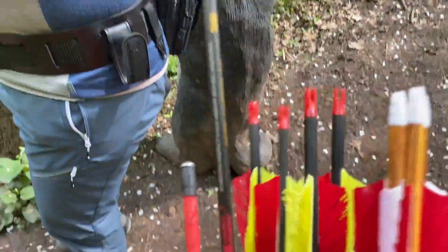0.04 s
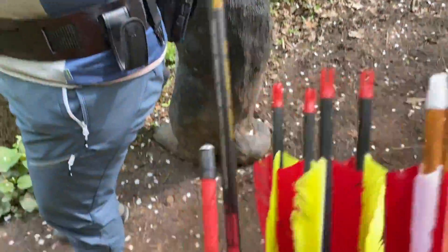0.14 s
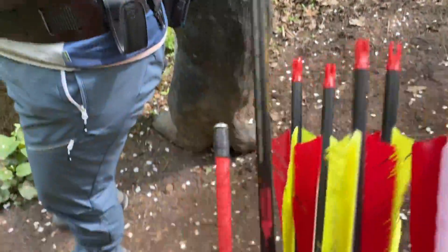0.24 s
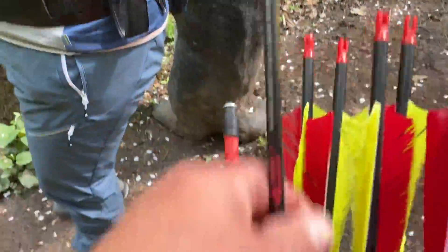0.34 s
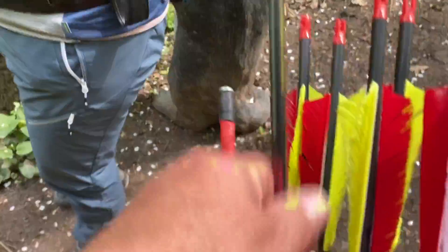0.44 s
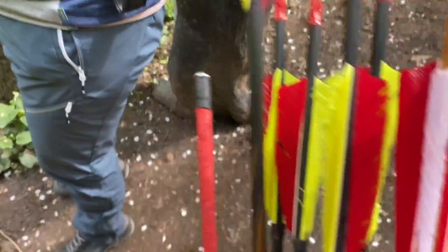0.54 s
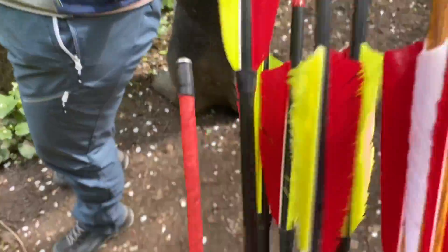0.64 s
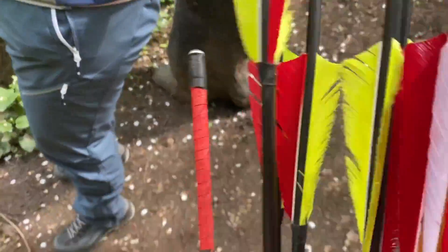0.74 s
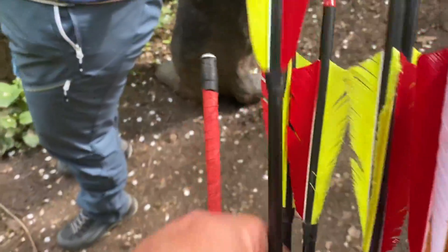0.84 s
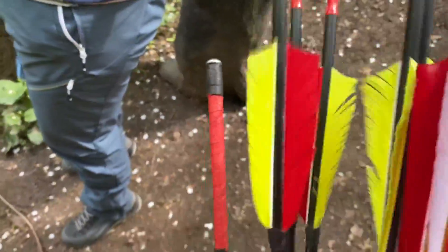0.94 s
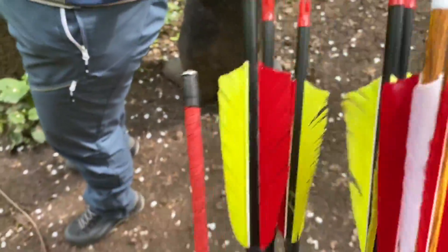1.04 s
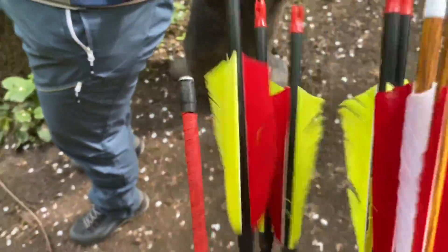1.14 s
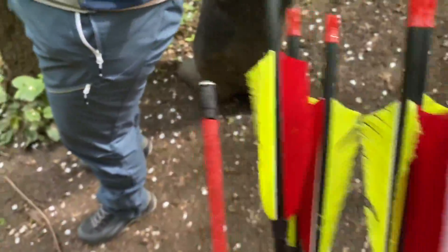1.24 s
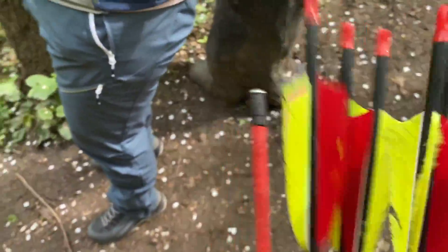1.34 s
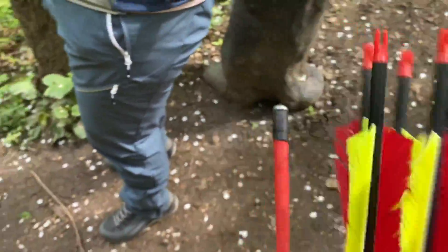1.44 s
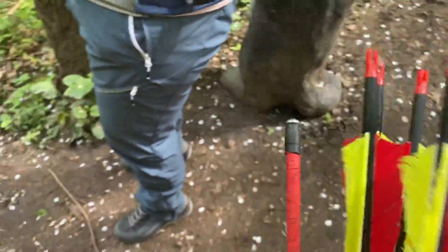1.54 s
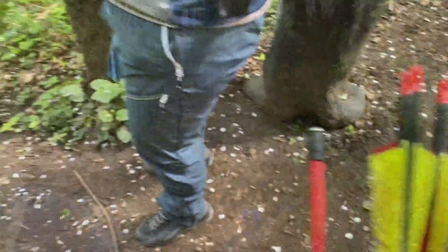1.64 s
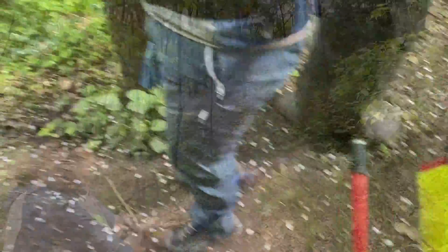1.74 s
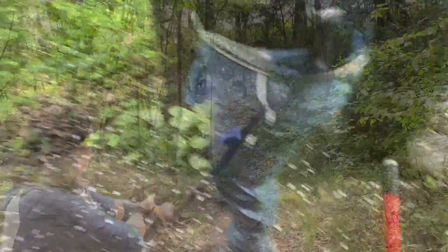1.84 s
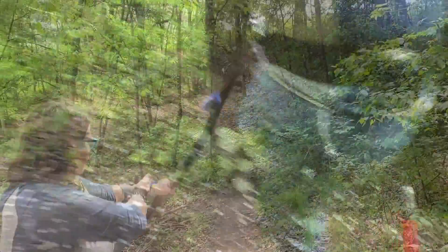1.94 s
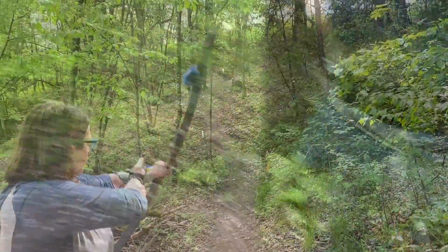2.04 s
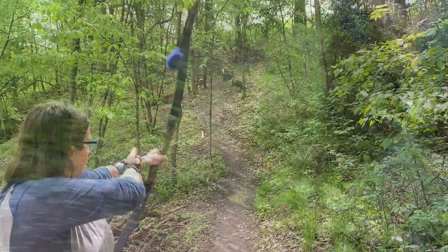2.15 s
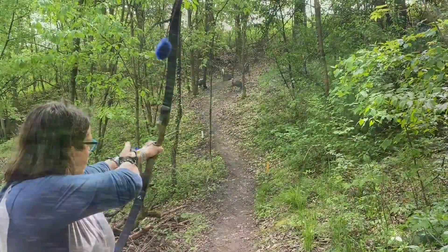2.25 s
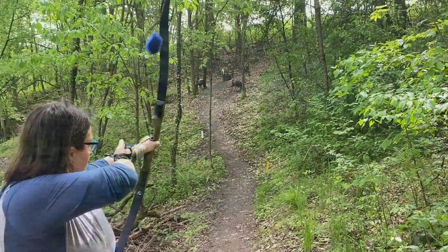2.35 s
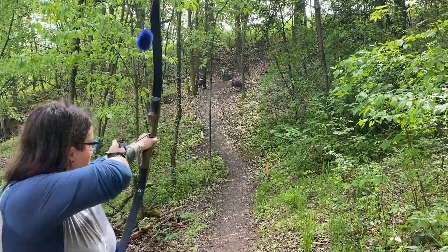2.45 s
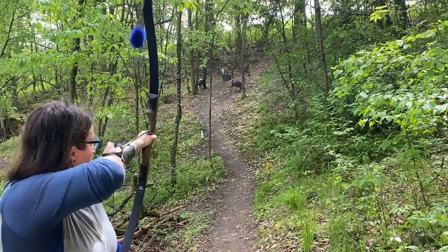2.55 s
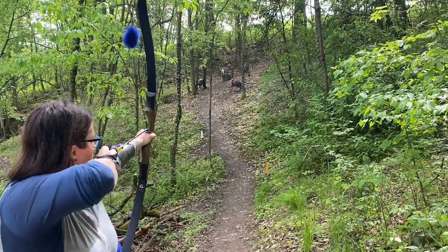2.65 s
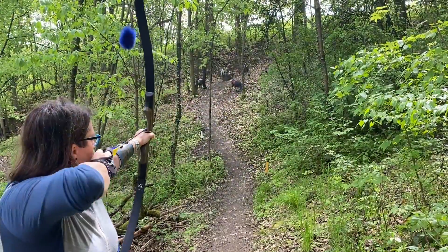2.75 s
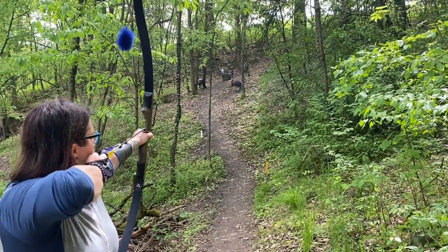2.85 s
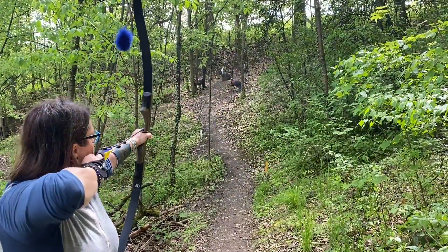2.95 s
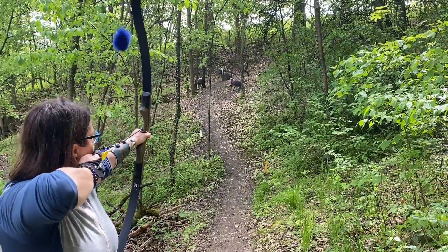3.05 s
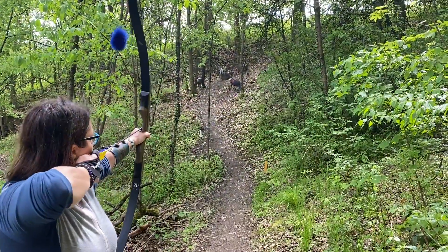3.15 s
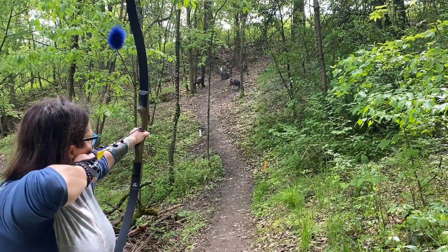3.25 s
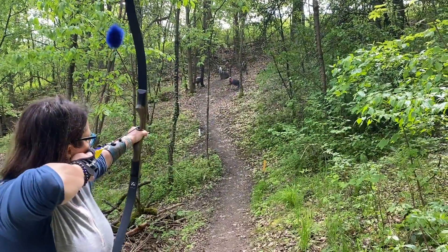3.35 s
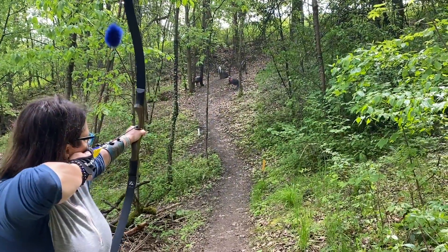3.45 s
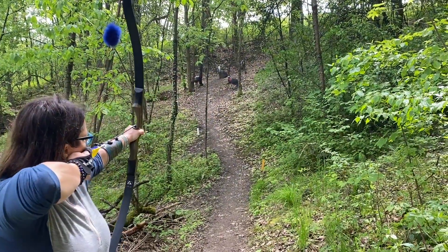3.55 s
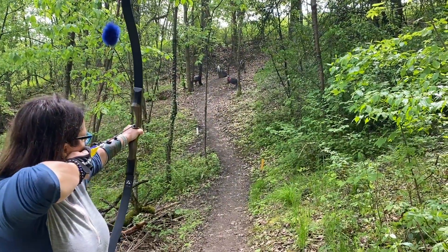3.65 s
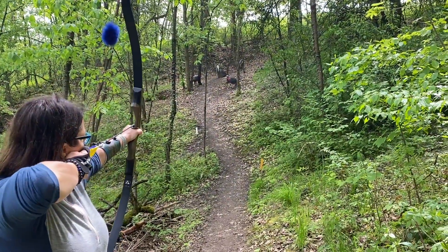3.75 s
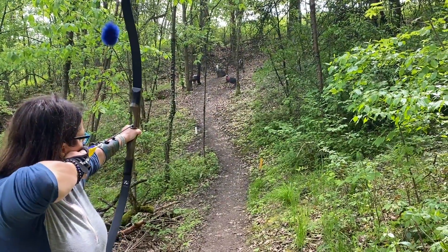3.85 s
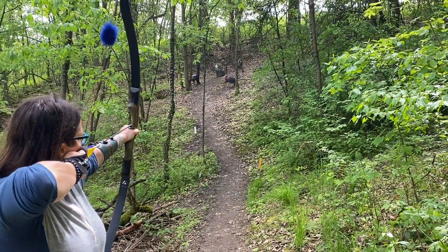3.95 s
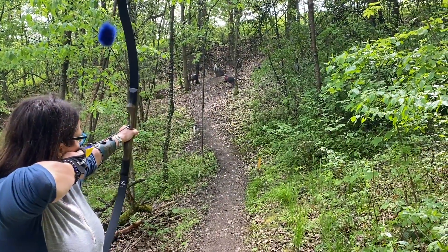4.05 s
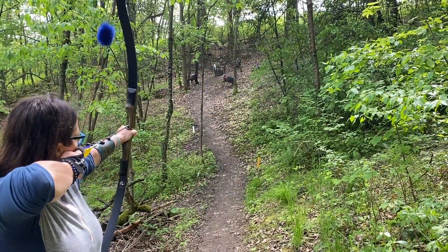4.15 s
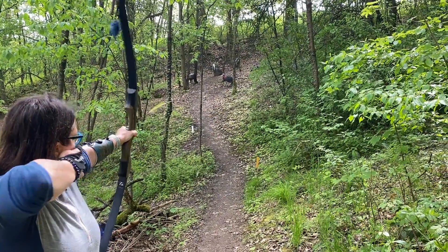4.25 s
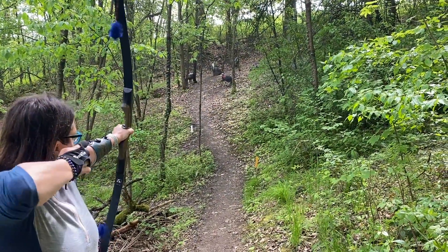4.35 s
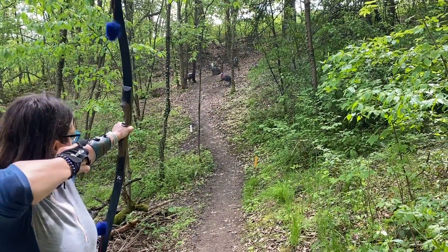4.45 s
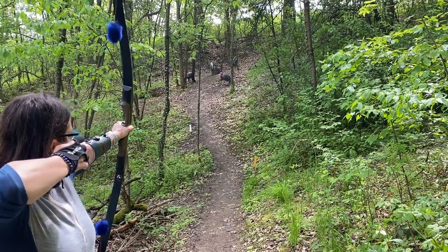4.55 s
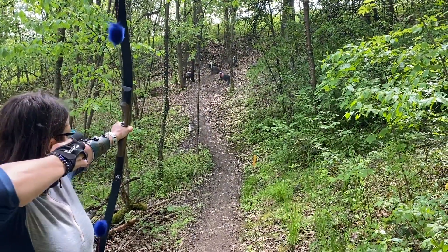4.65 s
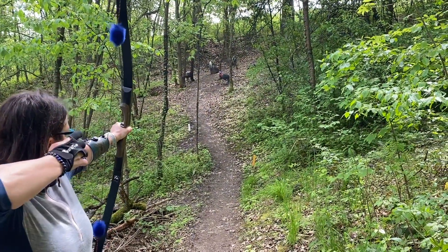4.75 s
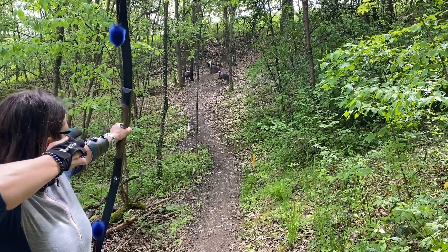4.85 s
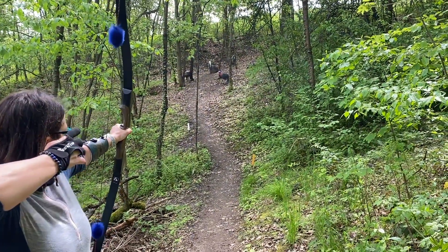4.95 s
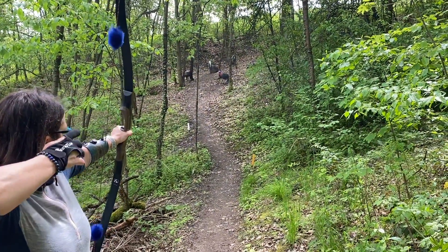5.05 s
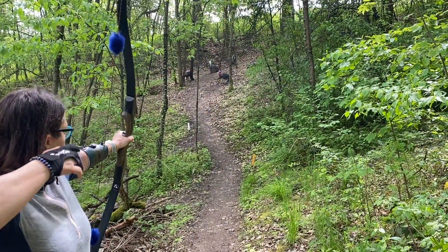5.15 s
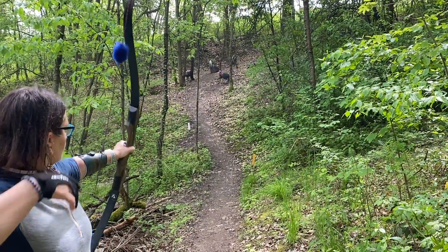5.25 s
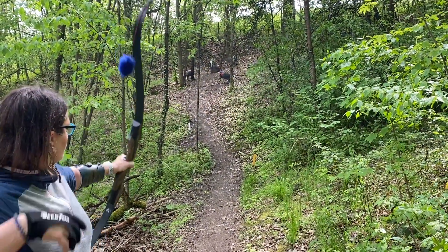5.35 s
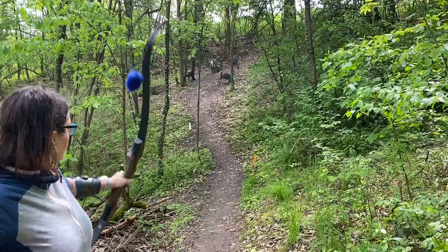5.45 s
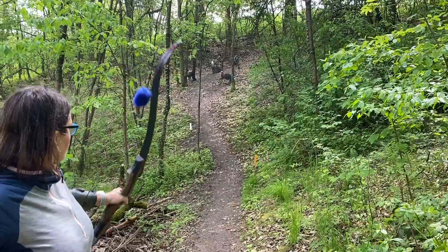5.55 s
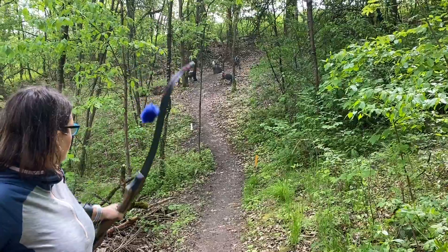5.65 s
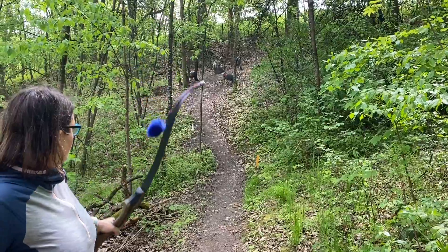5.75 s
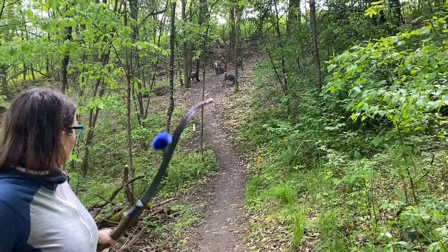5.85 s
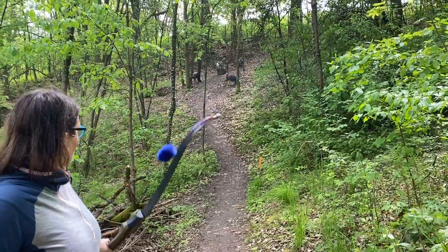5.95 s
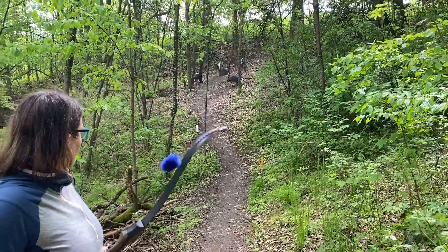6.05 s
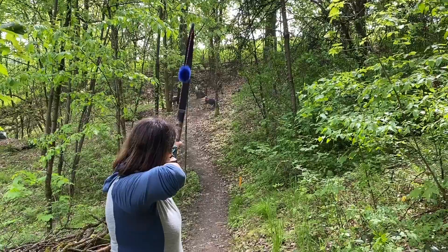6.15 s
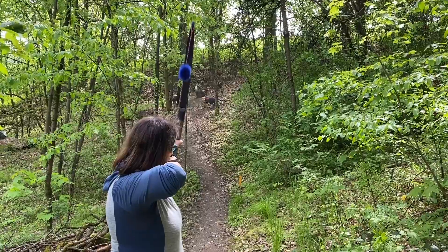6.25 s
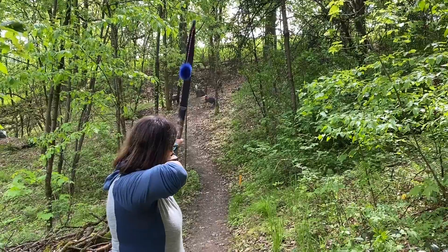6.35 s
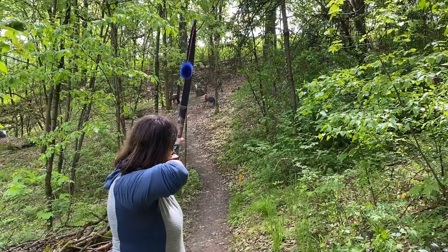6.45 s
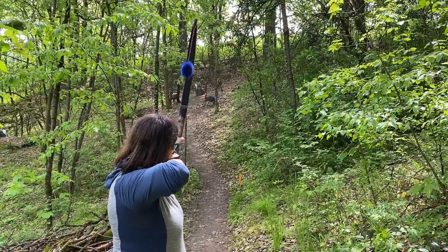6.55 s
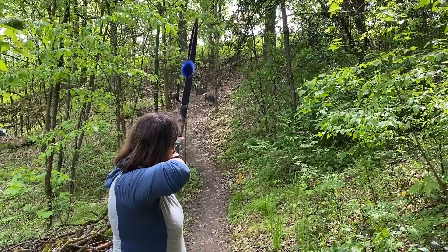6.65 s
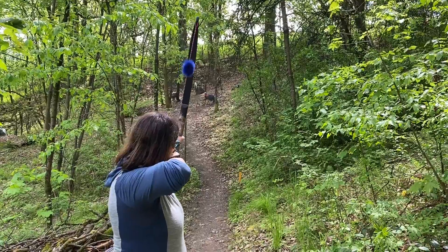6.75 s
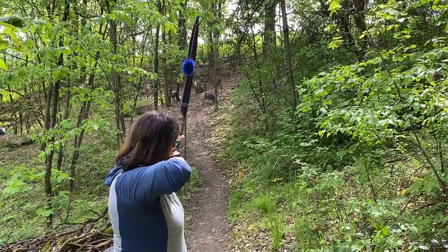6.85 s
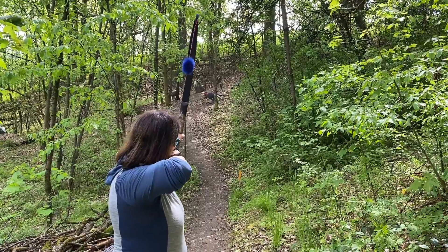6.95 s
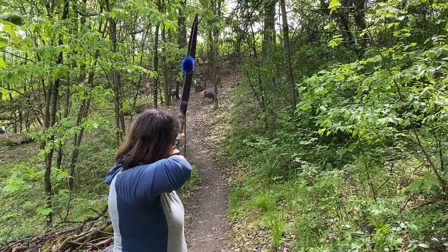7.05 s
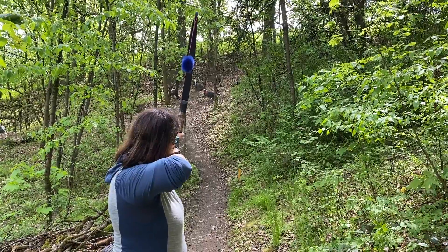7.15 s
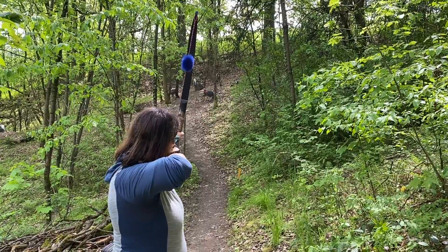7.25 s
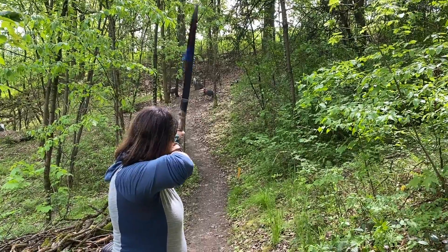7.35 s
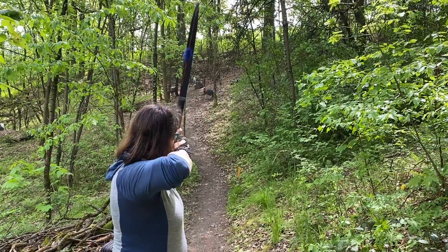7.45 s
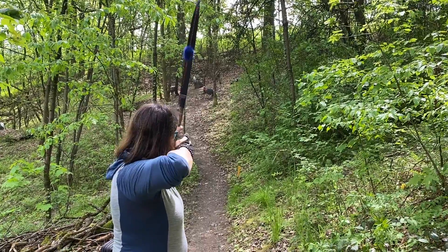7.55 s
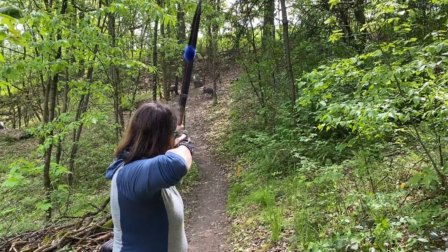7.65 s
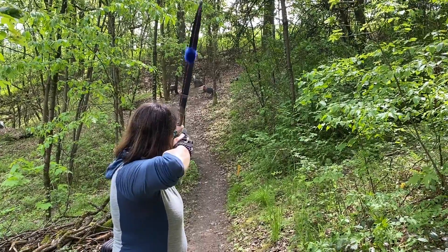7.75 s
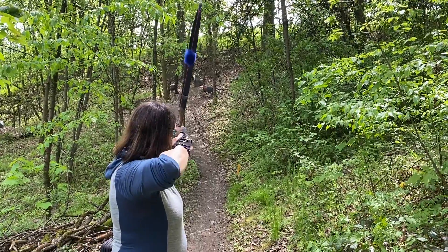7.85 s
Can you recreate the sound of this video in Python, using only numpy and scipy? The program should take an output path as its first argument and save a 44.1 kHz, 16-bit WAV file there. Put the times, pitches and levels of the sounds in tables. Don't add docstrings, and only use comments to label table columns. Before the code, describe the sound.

Outdoors among trees, dry feather strokes and clicking arrow shafts come right at the microphone, with low booms from the quiver, growing dense and loud. Then calm air, a low hum and small distant chirps. A sharp bowstring slap and woody vibration are followed by a leaf tick and a blunt foam thud with a diffuse forest echo. Faint feet and cloth move, birds continue, and another bow shot cracks near the end, with no second impact.

```python
import sys
import numpy as np
from scipy import signal
from scipy.io import wavfile

SR = 44100
rng = np.random.default_rng(int(sys.argv[2]) if len(sys.argv) > 2 else 0)


def volts(x):
    e = np.asarray(x, float) / 20
    return 10 ** e


def master(y):
    cut = np.clip(np.atleast_2d(y).T, -1, 1)
    pcm = np.round(cut * 32767)
    wavfile.write(sys.argv[1], SR, pcm.astype(np.int16))


N = 347949


def at_hz(points, hz):
    curve_hz, value = np.transpose(points)
    return np.interp(np.log(hz), np.log(curve_hz), value)


def drift(rate):
    step = 40
    r = np.exp(-2 * np.pi * rate * step / SR)
    white = rng.standard_normal(N // step + 2002)
    slow = signal.lfilter([1], [1, -2 * r, r * r], white)[2000:]
    return np.interp(np.arange(N) / step, np.arange(len(slow)), slow / slow.std())


def ring(clicks, hz, t60):
    r, w = volts(-60 / (t60 * SR)), 2 * np.pi * hz / SR
    return signal.lfilter([0, np.sin(w)], [1, -2 * r * np.cos(w), r * r], clicks + 1e-18)


def click(s, size):
    out = np.zeros(N)
    np.add.at(out, (np.asarray(s) * SR).astype(int), size)
    return out


def pan(db):
    return volts(np.array([[db / 2], [-db / 2]]))


def ports(x, lag):
    sample = np.arange(len(x[1]))
    return np.array([x[0], np.interp(sample - lag, sample, x[1])])


BAND_EDGES = 25.1 * 2 ** np.arange(0, 9.6, .5)
BANK = [signal.butter(2, pair, "band", fs=SR, output="sos") for pair in zip(BAND_EDGES, BAND_EDGES[1:])]


def bands(spectrum, envelope, alike, white):
    centres = np.sqrt(BAND_EDGES[:-1] * BAND_EDGES[1:])
    gains = volts(at_hz(spectrum, centres)) * (centres > spectrum[0][0])
    gains = gains / np.sqrt(np.sum(gains ** 2 * np.diff(BAND_EDGES)) * 2 / SR)
    out = 0
    for k in np.flatnonzero(gains):
        likeness = np.clip(alike(centres[k]), -1, 1)
        mid, side = white[k % 2]
        pair = np.sqrt((1 + likeness) / 2) * mid + np.sqrt((1 - likeness) / 2) * side * [[1], [-1]]
        out = out + gains[k] * signal.sosfilt(BANK[k], pair * envelope(centres[k]))
    return out


def bursts(hits, spectrum, treble_alike, spread_db, rise_ms, lag):
    def alike(hz):
        return treble_alike + (1 - treble_alike) / (1 + (hz / 700) ** 2)

    out = np.zeros((2, N))
    for s, peak_db, t60, pan_db, dark_db in hits:
        t = np.arange(int(1.3 * SR * min(t60, .3)) + 900) / SR
        rise = 1 - np.exp(-1000 * t / rise_ms)

        def shape(hz):
            fall_db = -60 * t / t60 * (hz / 2000) ** 0.3
            colour_db = spread_db * rng.normal() - dark_db * np.log2(hz / 2000)
            return rise * volts(fall_db + colour_db)

        puff = ports(bands(spectrum, shape, alike, rng.standard_normal((2, 2, len(t)))), lag)
        at = int(s * SR)
        out[:, at:at + len(t)] += volts(peak_db) * pan(pan_db) * puff
    return out


def knocks(rows, glide, swell_s):
    out = np.zeros(N)
    for s, db, hz, t60 in rows:
        t = np.arange(int(t60 * SR)) / SR
        swell = 1 - np.exp(-t / swell_s)
        cycles = hz * (t + glide * swell_s * swell)
        at = int(s * SR)
        out[at:at + len(t)] += volts(db - 2.0 - 60 * t / t60) * swell * np.sin(2 * np.pi * cycles)
    return out


# time in seconds, level in dB.
GUSTS = [(0, -49.5), (.42, -51.5), (.9, -43.5), (1.49, -43), (1.8, -48.5), (2.3, -56.5), (2.7, -52),
         (3.1, -55.5), (4.15, -54.5), (5.1, -52.5), (5.6, -54), (6.0, -51), (6.5, -56.5), (7.89, -52)]
# frequency in Hz, density in dB per Hz.
WIND = [(12, -45), (20, -15), (35, -6.5), (59, 1), (139, -3), (178, -5.5), (274, -13), (300, -16),
        (390, -36.5), (660, -120)]
# frequency in Hz, density in dB per Hz.
LEAVES = [(88, -25), (150, 1), (1310, -21), (2130, -23), (7510, -38.5), (8130, -37), (8620, -61.5),
          (9890, -43), (10900, -39.5), (12300, -43), (13000, -61.5), (16500, -62)]
# frequency in Hz, left-right likeness from -1 to 1.
AIR_ALIKE = [(60, 0.94), (180, 0.31), (550, -0.63), (1650, 0.12), (4970, 0.83), (15000, 0.52)]


def air_alike(hz):
    return at_hz(AIR_ALIKE, hz)


def air():
    gust_s, gust_level = np.transpose(GUSTS)
    gust_db = np.interp(np.arange(N) / SR, gust_s, gust_level)
    wind_db = gust_db + 3
    leaves_db = -54.5 + 0.94 * (gust_db - gust_db.mean())
    flutter = drift(9.6)

    def wind_shape(hz):
        return (hz < 260) * volts(wind_db + 2.4 * flutter + 2.2 * drift(2.2))

    def leaves_shape(hz):
        return volts(leaves_db + 1.5 * drift(4.0))

    white = rng.standard_normal((2, 2, N))
    wind = bands(WIND[:-1], wind_shape, air_alike, white)
    leaves = bands(LEAVES, leaves_shape, air_alike, white[::-1])
    return (wind + leaves) * pan(2.5)


# start in seconds, hold in seconds, level in dB.
STROKES = [(0, 0.1, -43), (0.16, 0.084, -48.5), (0.285, 0.16, -57), (0.432, 0.13, -44),
           (0.539, 0.052, -39.5), (0.636, 0.074, -42.5), (0.746, 0.043, -47), (0.856, 0.03, -43.5),
           (0.886, 0.057, -36), (0.981, 0.06, -46), (1.095, 0.29, -40), (1.416, .075, -37.5),
           (1.493, 0.03, -39), (1.563, 0.11, -42.5), (1.746, 0.614, -70.5), (2.189, 0.062, -63),
           (4.221, 0.0065, -58), (7.352, .006, -63), (5.831, 0.056, -63.5), (5.926, 0.086, -71.5)]
# frequency in Hz, density in dB per Hz.
FEATHER = [(180, -27.5), (300, -12), (2610, -0.5), (5190, 2), (7890, -2), (8870, -30), (9810, -3.5),
           (11600, -1.5), (13300, -13.5), (15700, -2.5), (16500, -29)]
# mode in Hz, level in dB, t60 in seconds.
TUBE = [(660, -24.5, 0.029), (1030, -27, 0.02), (1450, -27, 0.0095), (1944, -30, 0.013),
        (2350, -29, 0.0094), (3400, -30, 0.0035)]


def rustle():
    t = np.arange(N) / SR
    rise_db_per_s, fall_db_per_s = 900, 240
    strokes_db = []
    for s, hold, db in STROKES:
        before, after = np.maximum(s - t, 0), np.maximum(t - s - hold, 0)
        strokes_db.append(db - rise_db_per_s * before - fall_db_per_s * after)
    level_db = np.max(strokes_db, axis=0)
    dark_db = 0.1118 * (-50.5 - np.maximum(level_db, -66))
    grain_db = 1.0 * drift(25.0) + 1.6 * drift(120.0) + 2.5 * drift(450.0)
    grain = volts(level_db + 4 + np.clip(grain_db, -11, 8))

    def shape(hz):
        patches_db = 2.6 * drift(22.0) + 2.5 * drift(170.0)
        return grain * volts(patches_db - dark_db * np.log2(hz / 5000)) + 1e-12

    def alike(hz):
        return 0.074 + 0.12 / (1 + (hz / 300) ** 2)

    noise = bands(FEATHER, shape, alike, rng.standard_normal((2, 2, N)))
    tube = 0
    for hz, db, t60 in TUBE:
        contact = volts(np.minimum(2.7 * drift(9.5), 6))
        tube = tube + volts(db) * ring(noise * contact, hz, t60)
    return (noise + tube) * pan(0.73)


# start in seconds, peak in dB, left over right in dB, darkness in dB.
CLACKS = [(0.099, -27.5, -3, 4.5), (0.2746, -38.5, 4, 1), (0.428, -57, 0, -10.5), (0.578, -28, -14, 9),
          (0.636, -32, 10, 10), (0.6868, -28, -1, 7.5), (0.7222, -26, 4, 8), (0.8457, -39, -7, 18.5),
          (0.8912, -22, 4, -1), (0.923, -40, 1, -7.5), (0.9548, -26, 3, -1.5), (1.1186, -44, 4, -3),
          (1.1608, -14.5, 3, 0.5), (1.1845, -15, -4.5, 1), (1.234, -24, 0, -0.5), (1.2575, -23.5, -2, 6.5),
          (1.2842, -27.5, 1, 5.5), (1.3718, -16, -2, 3.5), (1.3991, -14.5, 0.5, -0.5),
          (1.5005, -11, 1.5, 3), (1.511, -20, 2, 0), (1.5529, -25, -3, -2), (1.5775, -12.5, 0, -2.5),
          (1.608, -8, -0.5, -1), (1.6312, -11.5, 0, 0), (1.6765, -24, 1, 6), (1.705, -27.5, -1, 6)]
# start in seconds, peak in dB, t60 in seconds.
EDGES = [(0.427, -43, 0.019), (0.7225, -32, 0.014), (0.8917, -20, 0.014), (1.2338, -25, 0.023),
         (1.3997, -12, 0.02), (1.427, -24.5, .02), (1.5523, -23, .025), (1.5774, -15, .022),
         (1.6082, -16, .03), (1.6317, -19, .022), (1.7837, -41.5, 0.021)]
# frequency in Hz, density in dB per Hz.
SHAFT = [(240, -28.5), (400, -15.5), (1370, -4), (1900, -3), (3530, -1.5), (3880, 0), (6800, 2),
         (9130, -6.5), (11200, -4), (15700, -16), (16500, -34)]
# mode in Hz, level in dB, t60 in seconds.
SHAFT_MODES = [(610, -15, 0.056), (999, -10.5, 0.051), (1840, -7.5, 0.12), (2260, -11, 0.033),
               (4000, -11, 0.018), (4720, -7.5, 0.049), (5640, -11.5, .03), (6500, -10, 0.027)]
# start in seconds, peak in dB, pitch in Hz, t60 in seconds.
SHAFT_RINGS = [(0.072, -41, 1510, 0.068), (0.1, -32.5, 1070, 0.06), (0.173, -39, 1390, 0.084),
               (0.579, -34, 625, 0.046), (0.635, -46, 634, 0.06), (0.721, -33.5, 1030, 0.15),
               (0.847, -42, 622, 0.046), (0.893, -24, 644, 0.06), (0.954, -46, 575, 0.06),
               (1.118, -32, 760, 0.073), (1.161, -18.5, 1098, 0.07), (1.183, -34, 1120, 0.06),
               (1.233, -31, 1180, 0.052), (1.257, -34, 680, 0.052), (1.364, -17, 685, 0.06),
               (1.401, -25, 954, 0.06), (1.456, -30, 1500, 0.04), (1.5015, -3, 453, 0.025),
               (1.5008, -2, 1021, 0.03), (1.579, -40, 1182, 0.06), (1.607, -27, 1030, 0.073),
               (1.631, -22, 860, 0.06), (1.677, -35, 630, 0.06),
               (0.1734, -35.5, 1840, 0.091), (0.274, -40, 1650, 0.055), (0.5787, -25, 1560, 0.035),
             (0.6873, -29, 2400, 0.057), (0.7228, -41, 1500, 0.05), (0.8917, -20.5, 1740, 0.03),
             (0.956, -27, 1630, 0.067), (1.1618, -39, 1850, 0.042), (1.1846, -20, 1710, 0.05),
             (1.2335, -30, 2020, 0.063), (1.3737, -28, 2200, 0.062), (1.4002, -11, 2235, 0.055),
             (1.4595, -24, 3400, 0.04), (1.5012, -1, 1970, 0.022), (1.5534, -26, 1960, 0.05),
             (1.5778, -14.5, 2060, 0.047), (1.6075, -9.5, 1870, 0.05), (1.6314, -16, 2080, 0.05)]
# start in seconds, peak in dB, pitch in Hz, t60 in seconds.
HIGH_RINGS = [(0.412, -40, 7100, 0.06), (0.4265, -36, 7010, 0.04), (0.8919, -13, 5230, 0.04),
              (0.923, -19, 7200, 0.059), (0.9544, -20, 5350, 0.028), (1.0864, -30, 3790, 0.04),
              (1.1199, -31, 7410, 0.04), (1.1638, -6.5, 5400, 0.028), (1.1846, -8, 6400, 0.047),
              (1.233, -18, 6160, 0.036), (1.2575, -18, 6500, 0.025), (1.3597, -21, 4090, 0.041),
              (1.3718, -16.5, 7256, 0.068), (1.3982, -16, 4450, 0.013), (1.425, -26, 4650, 0.04),
              (1.4914, -13, 4500, 0.027), (1.5529, -15, 6510, 0.025), (1.5775, -8, 4735, 0.035),
              (1.6084, -7, 3830, 0.04), (1.6313, -7, 4680, 0.04), (1.6772, -24, 4690, 0.04)]
# start in seconds, peak in dB, pitch in Hz, t60 in seconds.
BOOMS = [(0.473, -32, 250, 0.041), (0.536, -28.5, 124, 0.17), (0.581, -11, 286, 0.052),
         (0.848, -15, 269, 0.031), (0.909, -13, 270, 0.065), (0.927, -21.5, 300, 0.11),
         (0.949, -7, 250, 0.054), (1.365, -9.5, 277, 0.05), (1.402, -26.5, 270, 0.059),
         (1.5046, -9, 250, 0.07), (1.641, -11, 249, 0.059), (1.686, -26, 260, 0.052)]


def quiver():
    hits = [(s, db, .056 * np.exp(-0.051 * dark_db), pan_db, dark_db) for s, db, pan_db, dark_db in CLACKS]
    clacks = bursts(hits, SHAFT, treble_alike=0.33, spread_db=3.0, rise_ms=0.79, lag=1.3)
    edges = [(s, db, t60, 1.0, -2.5) for s, db, t60 in EDGES]
    clacks += bursts(edges, SHAFT, treble_alike=0.84, spread_db=1.5, rise_ms=0.16, lag=2.6)

    s, peak_db, _, dark_db = np.array(CLACKS).T
    rings = np.zeros((2, N))
    for hz, db, t60 in SHAFT_MODES:
        dulled_db = peak_db + db - 16.5 - .5 * np.abs(dark_db * np.log2(hz / 2000))
        for ear in (0, 1):
            luck_db = rng.normal(0, 4.5, len(s))
            rings[ear] += ring(click(s, volts(dulled_db + luck_db)), hz, t60)

    notes = SHAFT_RINGS + [(s, db, hz, t60 * .65) for s, db, hz, t60 in HIGH_RINGS]
    notes = notes + [(s, db - 7.5, hz * 1.045, t60) for s, db, hz, t60 in notes]
    ringing = volts(-5) * knocks(notes, glide=0, swell_s=0.00059)
    rings += ports([ringing, ringing], lag=0.5) * pan(1.5)

    overtones = [(s, db - 14.5, hz * 2.3, t60) for s, db, hz, t60 in BOOMS]
    booms = knocks(BOOMS, glide=0.27, swell_s=0.0019) + knocks(overtones, glide=0.47, swell_s=0.0028)
    return clacks + rings + booms * pan(1.1)


# start in seconds, peak in dB.
BUMPS = [(0.248, -28.5), (0.387, -31), (0.732, -24), (2.128, -22.5), (2.848, -34), (3.403, -27.5),
         (5.918, -32), (6.485, -28.5), (7.07, -32.5), (7.231, -36)]


def port_bumps():
    hz, t60 = 60.7, 0.12
    return knocks([(s, db, hz, t60) for s, db in BUMPS], glide=0.065, swell_s=0.0034) * pan(2.5)


# start in seconds, first Hz, last Hz, level in dB.
CHIPS = [(2.465, 2953, 2490, -63), (2.81, 4535, 3315, -60), (3.218, 4440, 3860, -66),
         (7.205, 4780, 4040, -71), (3.478, 3150, 4790, -61), (3.705, 3446, 2910, -60),
         (3.79, 2305, 2550, -54.5), (6.112, 3130, 2836, -54), (3.875, 2593, 2400, -58.5),
         (5.147, 3170, 4110, -55), (5.163, 4000, 3290, -53.5), (5.177, 3290, 4000, -70),
         (5.19, 3947, 3830, -70), (7.244, 3930, 4050, -63.5)]
# start in seconds, first Hz, last Hz, level in dB.
WHISTLES = [(1.855, 3560, 3390, -54.5), (1.875, 2110, 2103, -56.5), (1.9, 3300, 2870, -57),
            (2.42, 3080, 2956, -59), (2.684, 2810, 2870, -50), (2.747, 3060, 3190, -55.5),
            (2.822, 4390, 4450, -69), (2.86, 2080, 2420, -58.5), (2.979, 3770, 2360, -56),
            (3.03, 3070, 2680, -51.5), (3.295, 3560, 3440, -61.5), (3.306, 2990, 2815, -59.5),
            (3.521, 2550, 2390, -60), (3.56, 2350, 2097, -68), (3.38, 1996, 1885, -64),
            (3.8, 3145, 3300, -59), (4.189, 4060, 4350, -62.5), (3.99, 2480, 2305, -61),
            (4.102, 2807, 2676, -58), (4.146, 2690, 2424, -54.5), (5.385, 2330, 2331, -64),
            (5.39, 2500, 3400, -61.5), (5.435, 3206, 3066, -63.5), (6.2, 3545, 3400, -65),
            (6.14, 2900, 2950, -69), (6.161, 4050, 3360, -57), (7.265, 4150, 3555, -65)]
# start in seconds, first Hz, last Hz, level in dB.
DRAWLS = [(2.3, 2600, 2600, -56.5), (3.17, 3150, 3150, -59.5), (3.97, 2110, 1950, -67),
          (3.625, 3710, 3100, -61), (3.86, 1920, 1740, -66), (4.3, 2810, 2650, -59),
          (4.41, 2870, 2925, -60), (4.49, 2830, 2570, -70.5), (6.0, 2595, 2446, -61),
          (6.268, 3096, 3424, -56)]
# start in seconds, pitch in Hz, level in dB.
FAR = [(6.24, 4510, -70), (6.33, 2330, -74), (6.55, 4180, -69), (6.7, 2103, -73.5), (6.9, 1953, -74),
       (7.1, 2180, -73), (7.08, 3500, -79)]
# start in seconds, length in seconds, centre in Hz, width in Hz, level in dB.
TRILLS = [(5.441, 0.13, 6140, 518, -60.5), (6.898, 0.061, 7370, 511, -66.5),
          (7.072, 0.089, 5700, 148.7, -73.5), (3.381, 0.027, 4500, 605, -60),
          (3.822, 0.035, 3880, 605, -56), (3.857, .03, 3700, 400, -66.5), (4.133, 0.046, 6100, 295.2, -64),
          (6.02, 0.08, 2600, 251, -60)]


def birds():
    dry, waver = np.zeros(N), drift(60.4)
    far = [(s, hz, .975 * hz, db) for s, hz, db in FAR]
    for length_s, notes in [(0.024, CHIPS), (.05, WHISTLES), (0.11, DRAWLS), (0.25, far)]:
        n = int(length_s * SR)
        for s, first_hz, last_hz, db in notes:
            at = int(s * SR)
            hz = np.linspace(first_hz, last_hz, n) * (1 + .012 * waver[at:at + n] + .02 * np.hanning(n))
            tone = np.sin(2 * np.pi * np.cumsum(hz) / SR)
            dry[at:at + n] += volts(db) * tone * signal.windows.tukey(n, .6)
    for s, length_s, centre_hz, width_hz, db in TRILLS:
        at, n = int(s * SR), int(length_s * SR)
        t = np.arange(n) / SR
        buzz = np.sin(2 * np.pi * 95 * t) + 0.6 * waver[at:at + n]
        hz = centre_hz - width_hz * t / length_s + width_hz / 2 * buzz
        dry[at:at + n] += volts(db) * np.sin(2 * np.pi * np.cumsum(hz) / SR) * np.hanning(n) ** 0.57
    t = np.arange(int(.6 * SR)) / SR
    scatter = rng.standard_normal((2, len(t))) * volts(-60 * t / 0.69)
    scatter = scatter / np.sqrt(np.sum(scatter[0] ** 2))
    wet = signal.fftconvolve(dry[None], scatter, axes=1)[:, :N]
    return (dry * volts(-3) + wet * volts(-2.5)) * pan(2.5)


# start in seconds, peak in dB, darkness in dB.
TICKS = [(1.8653, -51.5, -1), (1.936, -44.5, 3.5), (2.2066, -45.5, 4), (2.245, -42, 6), (2.44, -47.5, 6),
         (2.7385, -47, 5), (5.0909, -55, 0), (5.8344, -47.5, -4.5), (5.8532, -43, -4), (5.869, -49, -2),
         (5.9572, -49, 4), (6.4467, -54, -1.5)]


def twigs():
    hits = [(s, db, 0.051, 3.5, dark_db) for s, db, dark_db in TICKS]
    return bursts(hits, FEATHER, treble_alike=0.69, spread_db=-5.5, rise_ms=1.5, lag=1.85)


# frequency in Hz, t60 in seconds.
ECHO_T60 = [(200, 0.97), (1000, 0.99), (4000, 0.74), (12000, 0.76)]


def echo(s, level_db, spectrum, slow, rise_s):
    at = int(s * SR)
    t = np.arange(min(int(1.6 * SR), N - at)) / SR

    def shape(hz):
        return (1 - np.exp(-t / rise_s)) * volts(-60 * t / (slow * at_hz(ECHO_T60, hz)))

    out = np.zeros((2, N))
    out[:, at:at + len(t)] = bands(spectrum, shape, air_alike, rng.standard_normal((2, 2, len(t))))
    return volts(level_db) * out


WHIP_S = [4.2458, 7.3755]
# string in dB, limb hum in dB, echo in dB, slaps in dB.
SHOTS = [
    (-1.5, -17.5, -28.5, 0.25),
    (-4, -20, -29, -2),
]
# mode in Hz, level in dB, t60 in seconds.
LIMBS = [(64.1, -12.5, 0.58), (129, -6.5, 0.68), (141.9, -5, 0.59), (195, -8, 0.76), (277, -6.5, 0.17),
         (310, -15, 0.11), (604, -19.5, 0.36)]
# mode in Hz, level in dB, t60 in seconds.
RISER = [(300, -17, .09), (560, -19.5, .1), (900, -24, .1), (1396, -21, .05), (2680, -19.5, .05)]
SLAP_S = [-.018, -.0081, -.001, .0075, .0249, .027, .031]
# peak in dB, t60 in seconds, left over right in dB, darkness in dB.
SLAPS = [(-26, .07, 2, 1.5), (-24, .08, 4.5, -1), (-22.5, 0.045, 4, 1.5), (-17.5, .07, 0, 0),
         (-14.5, .014, 3.5, -7), (-15, 0.093, 0, 1.5), (-16.5, .035, 1.5, -3)]
# start in seconds, peak in dB.
CRACKS = [(4.2444, -19.5), (7.3865, -20)]
# frequency in Hz, density in dB per Hz.
SLAP = [(150, -28.5), (250, -5), (1200, -5.5), (2240, -26.5), (2620, -11), (3410, -20.5), (7500, -11),
        (8930, -14), (11000, -21), (14000, -23), (16500, -33)]
# frequency in Hz, density in dB per Hz.
ECHO = [(41, -32), (70, -5.5), (446, -26), (586, -28), (704, -32), (7250, -35.5), (8500, -35), (9110, -70),
        (9980, -36), (15100, -43.5), (16500, -66.5)]


def bow():
    t = np.arange(int(0.013 * SR)) / SR
    whip = -np.sin(2 * np.pi * (263 * t - 6200 * t ** 2))
    whip = whip * (t / t[-1]) ** 0.7 * np.minimum((t[-1] - t) / 0.0013, 1)
    rumble_cut = signal.butter(2, 45, "high", fs=SR, output="sos")

    hits = [(s, db, 0.022, 1.5, -6) for s, db in CRACKS]
    out = np.zeros((2, N))
    for s, (string_db, hum_db, echo_db, slaps_db) in zip(WHIP_S, SHOTS):
        for after, (db, t60, pan_db, dark_db) in zip(SLAP_S, SLAPS):
            hits.append((s + after, db + slaps_db, t60, pan_db, dark_db))
        jolt = click([s + 0.005, s + 0.013, s + .031], volts(hum_db) * np.array([.6, -.9, -.7]))
        guard = click([s + .0258, s + .0272, s + .0335], [-1, 1, -.6])
        hum = sum(volts(db) * ring(jolt, hz, t60) for hz, db, t60 in LIMBS)
        hum += sum(volts(db + slaps_db) * ring(guard, hz, t60) for hz, db, t60 in RISER)
        swing = np.convolve(click([s + .0008], volts(string_db)), whip)[:N]
        out += (swing + signal.sosfilt(rumble_cut, hum)) * pan(3.0)
        out += echo(s, echo_db, ECHO, slow=0.84, rise_s=0.0032)
    return out + bursts(hits, SLAP, treble_alike=0.81, spread_db=1.0, rise_ms=0.21, lag=3.1)


# start in seconds, peak in dB, t60 in seconds, left over right in dB,
# darkness in dB.
LEAF_HITS = [(4.651, -44.5, 0.046, 0.5, -3), (4.667, -19, 0.025, -1, 0.5), (4.657, -36.5, 0.08, 0, 4)]
# frequency in Hz, density in dB per Hz.
LEAF = [(290, -29), (500, -44), (810, -0.5), (1700, -2), (2730, -7), (3600, -2.5), (5670, -19), (7380, -4),
        (15300, -19), (16500, -34)]
# mode in Hz, level in dB, t60 in seconds.
FOAM = [(168, -0.5, 0.018), (290, -4.5, 0.049), (580, 2.5, 0.013), (870, 0, 0.022), (1240, -3.5, 0.019),
        (1436, 4, 0.0065), (1980, -7, 0.025), (3700, -2, 0.0046)]
# frequency in Hz, density in dB per Hz.
THUD_ECHO = [(120, -15), (200, 0), (335, 1), (2210, -8), (2500, -18), (3000, -19), (7460, -28.5),
             (8490, -39), (9140, -40.5), (11000, -47), (16500, -68.5)]


def target():
    leaves = bursts(LEAF_HITS, LEAF, treble_alike=0.69, spread_db=3.5, rise_ms=2.5, lag=.6)
    thud_s, thud_db, echo_db = 4.7013, -6, -34.5
    blow = click([thud_s, thud_s + 0.001347], volts(thud_db - 10) * np.array([1, .7]))
    thud = np.zeros(N)
    for k, (hz, db, t60) in enumerate(FOAM):
        late = np.roll(blow, int(.9 * SR / hz))
        thud += (-1) ** k * volts(db) * ring(late, hz, t60)
    thud = signal.lfilter([.45], [1, -.55], thud)
    tail = echo(thud_s, echo_db, THUD_ECHO, slow=0.67, rise_s=0.002)
    tail += echo(thud_s, echo_db - 7, THUD_ECHO, slow=1.4, rise_s=0.028)
    tail += echo(LEAF_HITS[1][0], -37.5, LEAF, slow=0.42, rise_s=0.0032)
    return thud * pan(-2.8) + leaves + tail


# start in seconds, peak in dB, t60 in seconds,
# left over right in dB, darkness in dB.
SCUFFS = [(5.965, -55, .1, 1, -4), (6.005, -54, 0.13, 5, 1), (6.05, -57, 0.13, 3, 5),
          (6.09, -56, 0.075, 3, 1), (6.215, -48.5, .06, -1, -4.5), (6.236, -57, 0.046, 3.5, 1)]
# frequency in Hz, density in dB per Hz.
SCUFF = [(500, -21), (900, 1), (2300, -9), (3200, -9), (8000, -30)]


def scuffs():
    return bursts(SCUFFS, SCUFF, treble_alike=0.46, spread_db=4.5, rise_ms=4.0, lag=1.7)


def scene():
    stirring = rustle() + quiver() + port_bumps()
    shooting = bow() + target() + scuffs()
    return air() + stirring + birds() + twigs() + shooting


def band_limit(x):
    return signal.sosfilt(signal.butter(12, 16810, fs=SR, output="sos"), x)


# low edge in Hz, high edge in Hz.
MID_HOLES = [(8300, 9700), (12650, 13950), (15900, 22050)]
# low edge in Hz, high edge in Hz.
SIDE_HOLES = [(6850, 7600), (10400, 11950), (14450, 22050)]
# start in seconds, end in seconds.
BUSY_S = [(.58, .63), (.82, .97), (1.075, 1.2), (1.35, 1.455), (1.495, 1.64), (4.225, 4.278), (7.35, 7.412)]


def record(dry):
    left, right = signal.sosfilt(signal.butter(4, 40, "high", fs=SR, output="sos"), dry)
    hz, t, pair = signal.stft([left + right, left - right], SR, nperseg=256)
    treble = np.sum(np.abs(pair[0, hz > 6000]) ** 2, axis=0)
    calm = (treble < 12 * np.roll(treble, 3)) | (treble < volts(-66))
    busy = sum((t > start) & (t < end) for start, end in BUSY_S)
    for k, holes in enumerate([MID_HOLES, SIDE_HOLES]):
        gone = sum((hz > low) & (hz < high) for low, high in holes)
        pair[k] *= 1 - np.outer(gone, calm * (.995 - .15 * busy))
    mid, side = signal.istft(pair, SR, nperseg=256)[1][:, :N] / 2
    clipped = np.clip([mid + side, mid - side], -1, 1)
    top_cut = signal.cheby2(10, 50, 16900, fs=SR, output="sos")
    return band_limit(signal.sosfilt(top_cut, clipped))


dry = scene()
out = record(dry)
master(out)
```